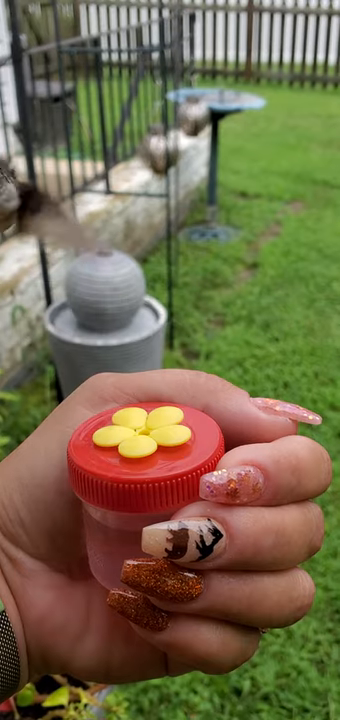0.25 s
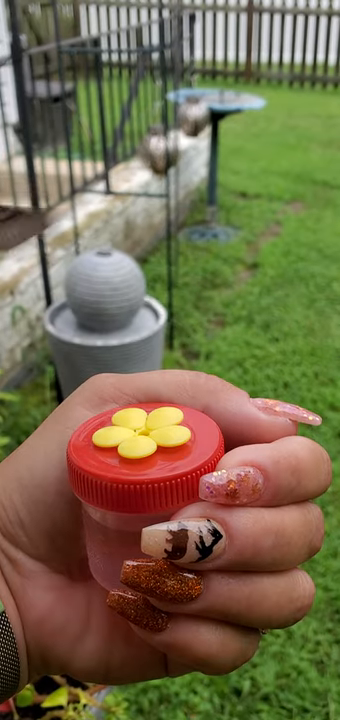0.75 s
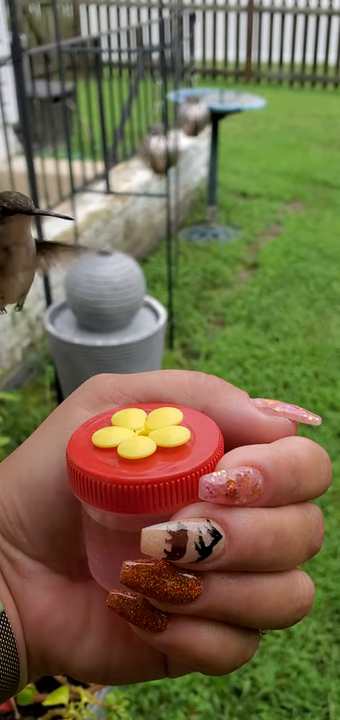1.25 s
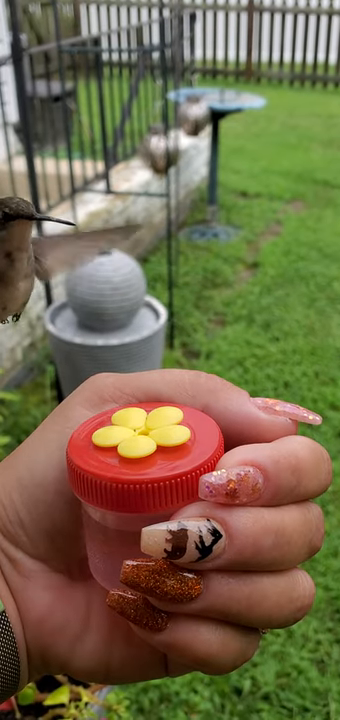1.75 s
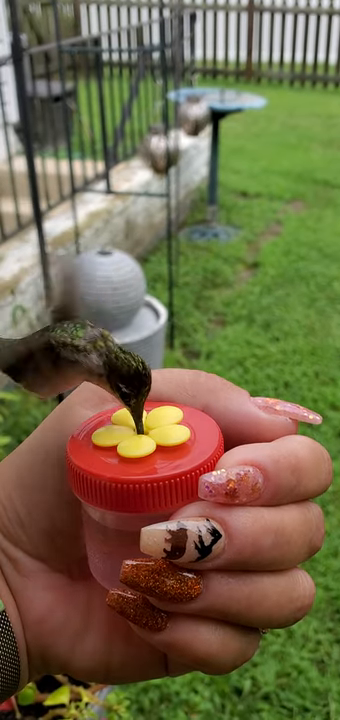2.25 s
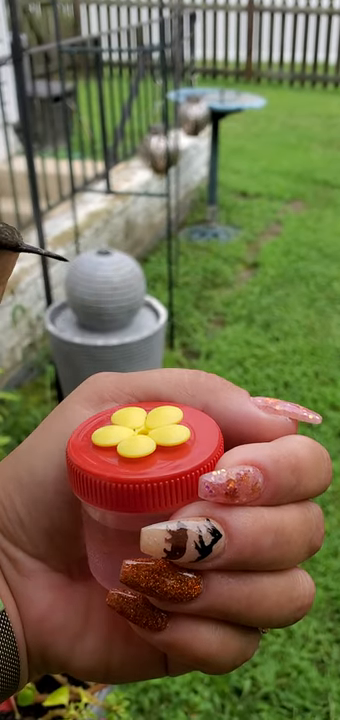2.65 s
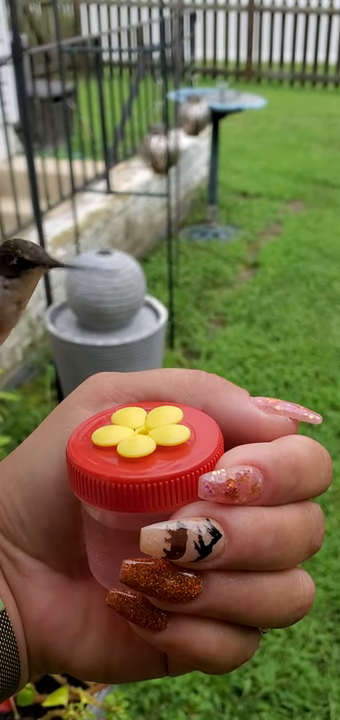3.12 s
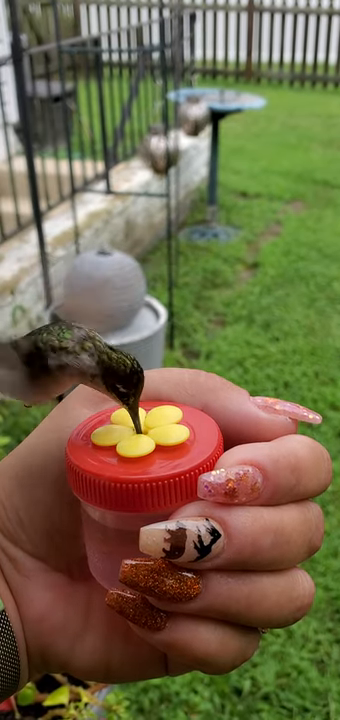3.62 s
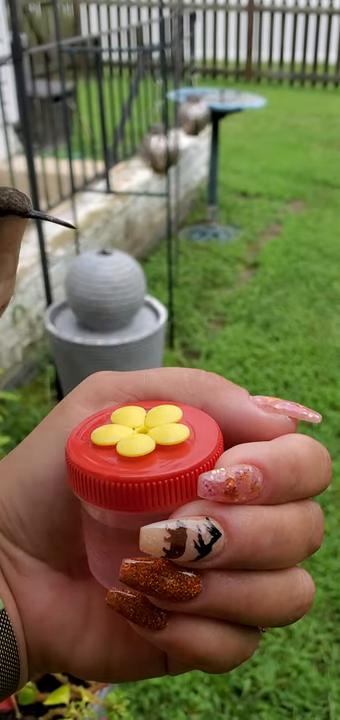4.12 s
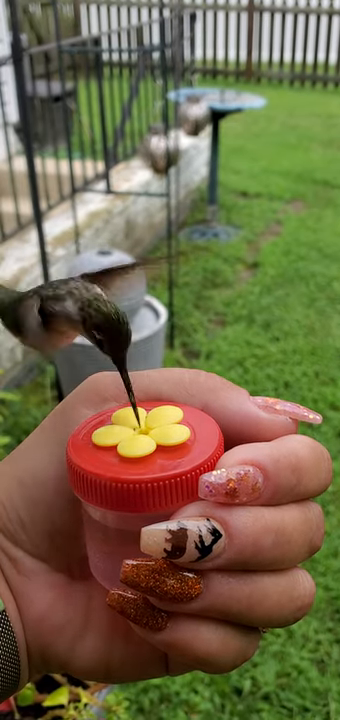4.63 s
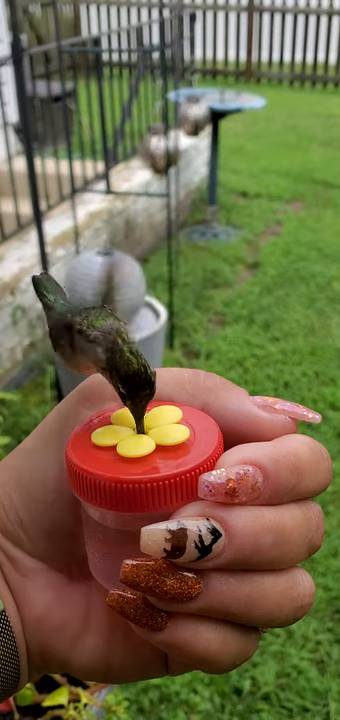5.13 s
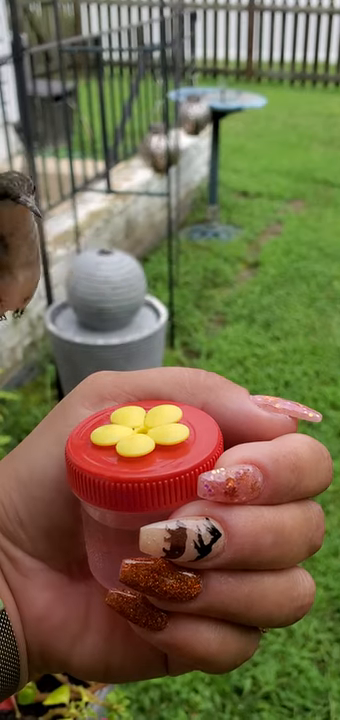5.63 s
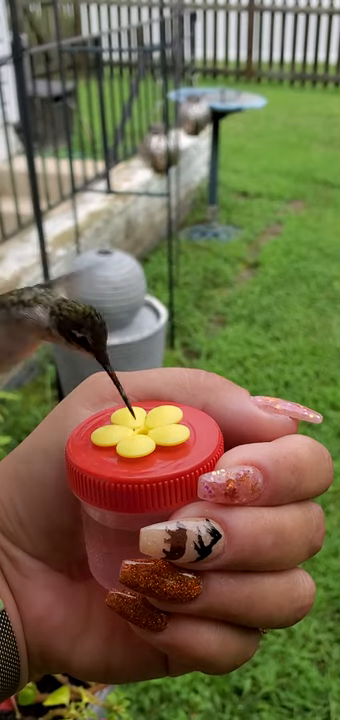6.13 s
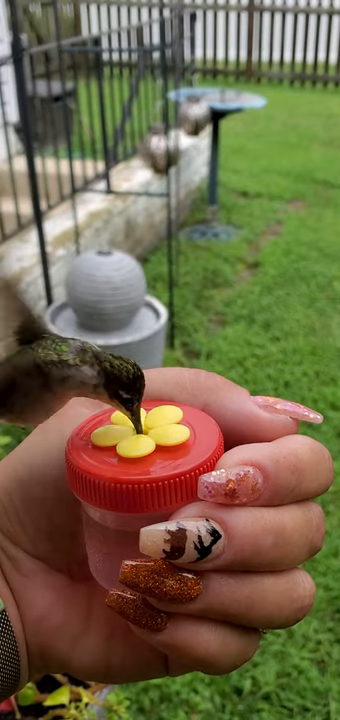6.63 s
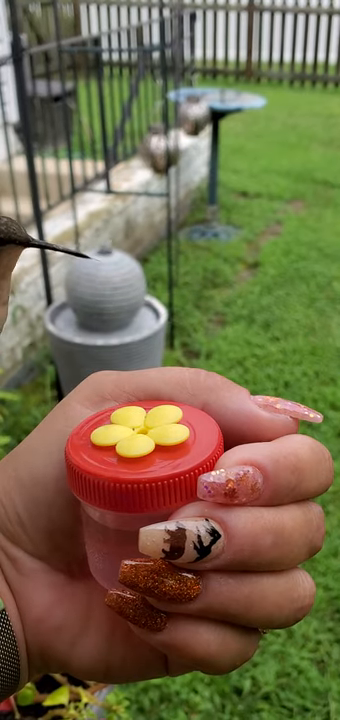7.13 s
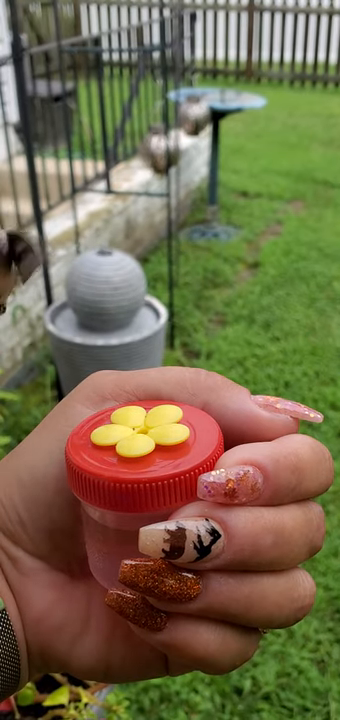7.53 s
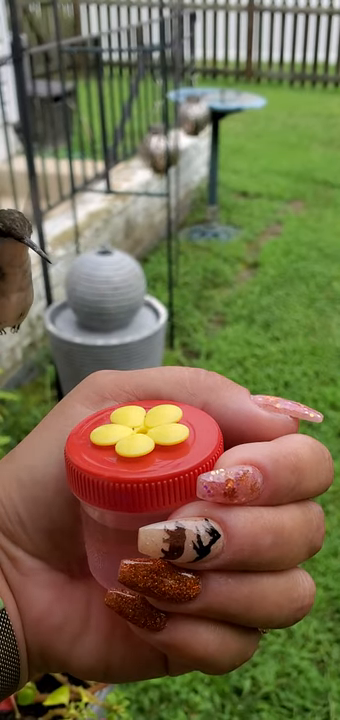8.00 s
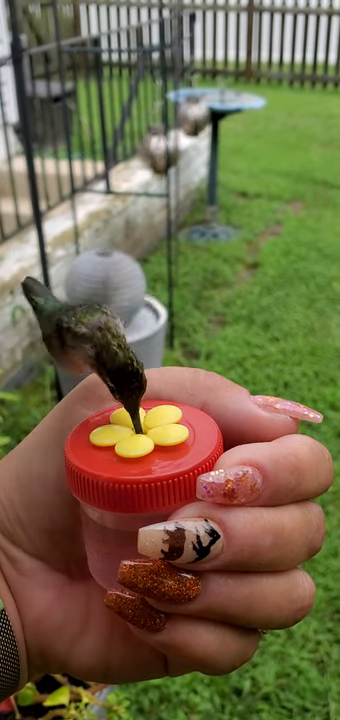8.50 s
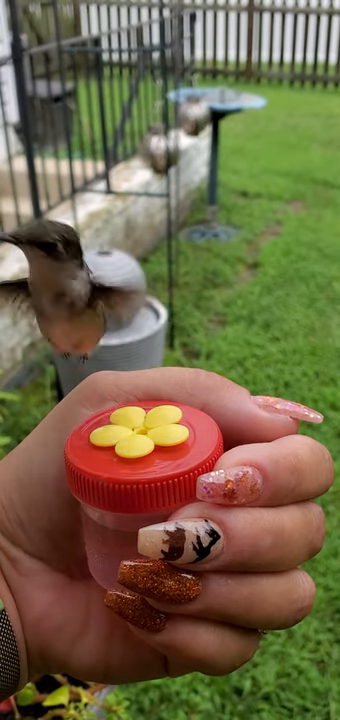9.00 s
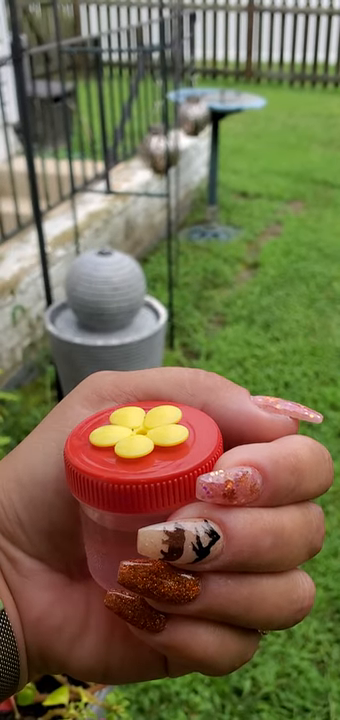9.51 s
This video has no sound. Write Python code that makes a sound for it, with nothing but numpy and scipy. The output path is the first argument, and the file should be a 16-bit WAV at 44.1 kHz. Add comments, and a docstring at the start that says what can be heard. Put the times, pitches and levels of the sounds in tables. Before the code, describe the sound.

A hummingbird's wings hum close by, surging as it darts, with two short chirps over faint backyard insects.

```python
"""A hummingbird hovers and darts at a hand-held feeder, just beside a phone with two microphone ports.
Its wings load the air periodically, so they hum in harmonics of the beat rate, stir the air and hiss at
the feather edges. It gives short falling chips, and faint ticks sound close by. Behind it a cricket
chorus swells, katydids saw, a mains transformer buzzes and a far engine drones in the yard."""
import sys
import numpy as np
from scipy import signal
from scipy.fft import rfft, irfft, next_fast_len
from scipy.io import wavfile
from scipy.ndimage import uniform_filter1d, map_coordinates

SR = 44100
rng = np.random.default_rng(int(sys.argv[2]) if len(sys.argv) > 2 else 0)


def bounce(signal):
    """Save signal as a 16-bit WAV file at the path given by the first command-line argument."""
    frames = np.transpose(np.atleast_2d(signal))
    limited = np.clip(frames, -1, 1)
    pcm = np.round(limited * 32767).astype(np.int16)
    wavfile.write(sys.argv[1], SR, pcm)


N = 430416
TIME = np.arange(N) / SR
LEFT, RIGHT = np.array([[1], [0]]), np.array([[0], [1]])


def wings():
    """Aerodynamic sound: one wingbeat cycle drives both the tonal hum and the pulsing air noise."""
    # Sudden moves that stir more air: time_s, boost_db
    darts = [(.09, 10), (1.07, 4), (1.82, 4), (1.98, 4), (2.49, 8.5), (3.81, 5.5), (4.66, 5), (5.27, 10),
             (6.08, 4.5), (6.82, 1.5), (7.37, 4), (8.32, 5), (8.98, 8.5), (9.249, 6.5), (9.42, 6.5)]
    dart_db = bumps(*np.transpose(darts), width_s=0.02497)
    beat_hz, facing, lift_db, sweep_db, lift_right_db = flight(dart_db)
    phase = 2 * np.pi * np.cumsum(beat_hz * (1 + 0.00401 * wobble(18)[0])) / SR
    hum = wing_hum(phase, dart_db, facing, lift_db, sweep_db, lift_right_db)
    return hum + downwash(phase, dart_db, lift_db) + feather_hiss(phase, dart_db)


def flight(dart_db):
    """Relaxation: each move turns the bird and pushes up the beat rate, which then decays toward rest."""
    # Held poses; facing runs from -1 (sideways) to 1 (toward the phone):
    # start_s, push_hz, facing, lift_left_db, sweep_right_db, lift_right_minus_left_db
    moves = [(0.0, 5.6, 0.43, -43, -43.5, -8), (0.221, 7.8, 0.73, -41, -48, -7),
             (0.58, 10.6, 0.7, -42, -47.5, -8), (0.981, 11.8, 0.46, -42.5, -51.5, -11),
             (1.77, 7.3, 0.29, -40, -51, -15), (1.899, 15, 0.098, -40, -46, -7),
             (2.15, 3.56, 0.19, -41, -48, -3), (2.55, 14.4, 0.4, -39.5, -45, -11),
             (2.96, 6.1, -0.61, -40, -55.5, -9), (3.17, 12.3, -0.11, -38.5, -49, -10),
             (3.699, 6.04, 0.11, -40, -49, -6.5), (3.94, 2.92, 0.45, -41, -49.5, -10),
             (4.439, 8.4, 0.12, -39.5, -47, -17.5), (4.58, 15.1, 0.44, -40, -44, -7),
             (4.89, 2.6, 0.38, -39.5, -44, -9), (5.15, 4.67, 0.48, -39, -46, -7),
             (5.41, 3.2, 0.45, -40, -49, -11), (5.98, 12.6, -0.34, -37.5, -52, -14.5),
             (6.11, 13, -0.31, -40.5, -51, -5), (6.7, 7.35, -0.09, -37.5, -50, -7),
             (6.94, 1.29, 0.21, -39.5, -49.5, -20), (7.25, 4.63, 0.53, -41, -50.5, -8),
             (7.83, 10.9, 0.31, -40.5, -51.5, -16), (8.23, 21, 0.61, -40.5, -43.5, -7),
             (8.47, 6.3, 0.22, -41.5, -43, -7), (8.61, 6.54, 0.33, -39, -43, -10),
             (8.89, 6.3, 0.39, -41.5, -45.5, -6), (9.17, 13.9, 0.17, -46.5, -49, 5.5),
             (9.4, 1.49, 0.49, -51, -64, -1.5), (9.58, 2.16, 0.71, -63, -66, -4)]
    start_s, push_hz, *pose = np.transpose(moves)
    rest_hz, opening_excess_hz, lasting_share = 39.91, 8.4, 0.225
    rise_s, overshoot_s, sag_s, settle_s = 0.055, 0.085, 1.43, 0.06
    age_s = np.maximum(TIME - start_s[:, None], 0)
    rise = 1 - np.exp(-age_s / rise_s)
    fall = lasting_share * np.exp(-age_s / sag_s) + (1 - lasting_share) * np.exp(-age_s / overshoot_s)
    beat_hz = rest_hz + opening_excess_hz * np.exp(-TIME / sag_s) + push_hz @ (rise * fall)
    beat_hz += 0.37 * dart_db  # a dart briefly quickens the beat
    held = np.array(pose)[:, np.maximum(np.searchsorted(start_s, TIME) - 1, 0)]
    facing, lift_db, sweep_db, lift_right_db = uniform_filter1d(held, round(settle_s * SR), axis=1)
    swell = lambda delay_s, width_s: bumps(np.clip(start_s + delay_s, 0, None), push_hz, width_s)
    lift_db += 0.1159 * swell(-0.063, 0.046)  # lift swells just before a push
    lift_db -= 0.5 * swell(0.029, 0.02)  # and falters as it begins
    sweep_db += 0.14 * swell(0.088, 0.027)
    return beat_hz, facing, lift_db, sweep_db, lift_right_db


def wing_hum(phase, dart_db, facing, lift_db, sweep_db, lift_right_db):
    """Dipole near field: each harmonic of the beat reaches the two ports with its own size and sign."""
    # Both half strokes push air down, so lift sounds in even harmonics: order, offset_db
    lift_overtones = [(4, -30), (6, -40.5), (8, -36.5), (10, -51.5)]

    def tone(order, db, lead_rad, spread_db):
        return np.sqrt(2) * amp(db + spread_db * wobble(14, count=2)) * np.cos(order * phase + lead_rad)

    lift_lead_rad = (3.08 + 2.42 * facing) * LEFT
    reversal_db = -54.5 + 1.16 * (sweep_db + 46.5) + 1.2 * facing  # stroke reversal follows the sweep
    flutter_db = -59.5 + 7.6 * facing + 0.31 * np.minimum(lift_db + 41.5, 0)  # tips: louder in front
    hum = (facing * LEFT + RIGHT) * tone(1, sweep_db, 0, spread_db=3)
    hum += tone(3, reversal_db + 0.55 * dart_db, -1.1 * LEFT, spread_db=1.64)
    hum += tone(5, flutter_db + 0.66 * dart_db, -0.4 * LEFT, spread_db=1.64)
    hum += tone(7, flutter_db - 7, 0, spread_db=3)
    hum += tone(2, lift_db + RIGHT * lift_right_db, lift_lead_rad, spread_db=1.97)
    # A dart sharpens the stroke; facing away hides the overtones from the right port.
    overtone_db = 0.62 * lift_db + 0.96 * dart_db - 4 * facing + (14 * facing - 9) * RIGHT
    for order, offset_db in lift_overtones:
        hum += tone(round(order), overtone_db + offset_db, lift_lead_rad, spread_db=3.5)
    return hum


def downwash(phase, dart_db, lift_db):
    """Turbulence: stirred air makes a low rush that pulses on each half stroke."""
    # Spectral shape of the rush: frequency_hz, left_db, right_db
    spectrum = [(20.2, -29, -46), (39.8, -10, -7), (74, 4, 6), (135, -2, -1.5), (242, -5, -5),
                (414, -11, -10.5), (574, -24, -25.5), (1560, -57, -50)]
    leaving_db = 0.14 * np.minimum(lift_db + 46.5, 0)
    gain = amp(-49.5 + dart_db + leaving_db + 1.26 * wobble(7))
    return gain * unit((1 + 0.22 * np.cos(2 * phase)) * noise(coloured(spectrum), coherence=0.62))


def feather_hiss(phase, dart_db):
    """Edge noise: the feathers hiss on every half stroke, more on the down stroke."""
    # Base level of the hiss: time_s, level_db
    envelope = [(0, -59), (1.8, -64), (2.3, -57), (5.4, -61.5), (6.5, -57.5), (8, -60.5), (9.3, -56),
                (9.6, -69)]
    puffs = 1 + 0.76 * np.cos(2 * phase) + 0.27 * np.cos(phase)
    hiss = unit(noise(coloured([(2500, -34, -34), (9150, -22, -20), (15400, 5, -9)])))
    return amp(curves(envelope) + 0.41 * dart_db + 0.6 * wobble(7.4)) * puffs * hiss


def chips():
    """Source and filter: the throat shapes a falling harmonic call, which wall and fence reflect."""
    # Calls: start_s, source_db, left_minus_right_db, pitch_hz
    calls = [(1.848, -32, 7.5, 2138), (2.961, -31.5, 6, 2200), (9.057, -62.5, 9, 2780),
             (9.614, -55, 5, 2198)]
    # Contour of one call: time_s, pitch_ratio, gain_db
    glide = [(0, 1.02, -14), (.004, 0.97, 1), (.010, .96, 2.5), (.014, .88, 1.5), (.019, .79, -1),
             (.022, .72, -7.5), (.025, 0.65, -24)]
    # Throat response: frequency_hz, gain_db
    throat = [(1400, -11), (2200, -3.5), (4000, -3.5), (5000, -11), (6200, 1.5), (8200, -7), (10500, -13),
              (12500, -24), (15000, -13)]
    out, t = np.zeros((2, N + SR)), np.arange(round(glide[-1][0] * SR)) / SR
    pitch_ratio, contour_db = curves(glide, t)
    orders = np.arange(1, 10)[:, None]
    right_delay_s, reverb_s = 0.0012, 0.12
    for start_s, source_db, pan_db, pitch_hz in calls:
        hz = orders * pitch_hz * pitch_ratio
        harmonics = coloured(throat)(hz)[0] * np.sin(2 * np.pi * np.cumsum(hz, axis=1) / SR)
        hoarseness = 1 + 1.6 * uniform_filter1d(rng.standard_normal(len(t)), size=40)
        call = amp(source_db + contour_db) * harmonics.sum(axis=0) * hoarseness
        out[0, round(start_s * SR):][:len(t)] += call
        out[1, round((start_s + right_delay_s) * SR):][:len(t)] += call * amp(-pan_db)
    echo = rng.standard_normal((2, SR // 8)) * amp(-60 * np.arange(SR // 8) / SR / reverb_s)
    echo /= np.linalg.norm(echo[0])
    return out[:, :N] + amp(-15.5) * signal.fftconvolve(out, echo, axes=1)[:, :N]


def ticks():
    """Exponential decay: each faint dry tick is a noise burst, with a ringing tone in the lower ones."""
    # Ticks close by: start_s, level_db, centre_hz
    events = [(.43, -69, 4300), (4.42, -66, 4297), (5.615, -59.5, 8514), (5.68, -63, 9970),
              (5.692, -61, 12530), (6.805, -60, 2185), (7.038, -60, 1480), (8.187, -62.5, 4800),
              (8.501, -53, 8910), (8.52, -60.5, 10990), (8.567, -57, 11000), (8.575, -58.5, 2860),
              (9.196, -56, 1904), (9.545, -57, 11000)]
    out, t = np.zeros((2, N + SR)), np.arange(SR // 50) / SR
    attack_s, t60_s = 0.0017, 0.058
    envelope = amp(5.5 - 60 * t / t60_s) * (1 - np.exp(-t / attack_s))
    for start_s, level_db, hz in events:
        sos = signal.butter(2, [0.72 * hz, 1.4 * hz], "bandpass", fs=SR, output="sos")
        burst = unit(signal.sosfilt(sos, rng.standard_normal(len(t))))
        ring = np.sin(2 * np.pi * hz * t) * (hz < 5000)
        out[:, round(start_s * SR):][:, :len(t)] += amp(level_db - 5 * RIGHT) * envelope * (burst + ring)
    return out[:, :N]


def crickets():
    """Incoherent summation: many crickets blur into noise bands, the near one swelling and trilling."""
    # Runs of chorus swells: start_s, count, interval_s
    swell_runs = [(.31, 3, .375), (1.54, 8, .365), (4.38, 5, .345), (6.17, 3, .375), (7.33, 5, .41),
                  (9.49, 1, 0)]
    swells = amp(-57.5) * uneven_bumps(runs(swell_runs), spread_db=0.5, width_s=0.049)
    trill = 1 + 0.14 * np.cos(2 * np.pi * np.cumsum(100 + 4 * wobble(5.7)[0]) / SR)
    near = (amp(-63) + 0.5 * swells) * trill * unit(noise(band(6057, 365), coherence=0.055))
    far = amp(-62.5 + 0.67 * wobble(6)) * unit(noise(band(6680, 770), coherence=0.058))
    return near * amp([[2], [-3]]) + far * amp([[1], [-1.5]])


def katydids():
    """Stridulation: three katydids saw, each at its own pitch and pace, two with fast tooth pulses."""
    # Runs of strokes of the middle-pitched insect: start_s, count, interval_s
    stroke_runs = [(.24, 4, .235), (1.26, 8, .29), (3.52, 29, .2203)]
    teeth = (1 + np.cos(2 * np.pi * np.cumsum(112 + 5 * wobble(5.9)[0]) / SR)) ** 0.12
    strokes = 0.14 + uneven_bumps(runs(stroke_runs), spread_db=1.9, width_s=0.034)
    middle = strokes * amp(-64.5) * unit(teeth * noise(band(9010, 400)))
    high = amp([[-69], [-64]]) * unit(teeth * noise(band(9320, 250)))
    low = amp([[-68], [-78]]) * unit(noise(band(8270, 300)))
    high *= 0.096 + uneven_bumps(np.arange(0.105, N / SR, 0.2208), spread_db=1.9, width_s=0.02)
    low *= 0.11 + uneven_bumps(np.arange(0.013, N / SR, 0.112), spread_db=2.2, width_s=0.015)
    return middle + high + low


def transformer():
    """Interference: each overtone of the buzz fades in and out as it meets its slowly shifting echo."""
    # Harmonics of twice the mains frequency: order, left_db, right_db, left_lead_rad, null_s, period_s
    overtones = [(9, -73, -79, 1.4, 5, 60), (10, -67, -78, .1, 4, 60), (11, -64, -71, -.1, 5.25, 60),
                 (12, -68, -69, 1.6, -2, 60), (17, -84, -87, 1.6, 6, 12), (20, -74, -73, -1.6, 2.75, 9),
                 (21, -75, -75, -.1, .5, 10), (22, -77, -78, .6, 4, 4.5), (23, -76, -72, -1.1, 8.25, 20),
                 (24, -75, -82, 1.5, 2, 9), (25, -81, -85, -1.1, -1.25, 7.5), (26, -66, -73, -.6, 7, 60),
                 (27, -72, -76, 2.5, 4, 60), (28, -86, -86, 1.1, 1, 4.5)]
    fundamental_hz, buzz = 120.02, 0
    for order, left_db, right_db, lead_rad, null_s, period_s in overtones:
        fading = np.abs(1 - 0.6 * np.exp(2j * np.pi * (TIME - null_s) / period_s))
        phase = 2 * np.pi * fundamental_hz * order * TIME + rng.uniform(0, 2 * np.pi) + lead_rad * LEFT
        level_db = left_db * LEFT + right_db * RIGHT + 1.2 * wobble(2, count=2)
        buzz += np.sqrt(2) * amp(level_db) * fading * np.sin(phase)
    return buzz


def far_engine():
    """Slow modulation: a far engine is one low tone that wavers in pitch and level."""
    # Course of the drone: time_s, pitch_hz, level_db
    drone = [(0, 85.55, -67), (2.6, 85.55, -49.5), (3.3, 81.88, -53), (4.7, 82.37, -50.5), (6, 83.15, -59),
             (7.5, 82.18, -74), (9.76, 83.1, -54)]
    pitch_hz, level_db = curves(drone)
    return np.sqrt(2) * amp(level_db + 1.4 * wobble(3.1)) * np.sin(2 * np.pi * np.cumsum(pitch_hz) / SR)


def yard():
    """Noise floor: distant traffic, leaves and microphone hiss, nearly uncorrelated between the ports."""
    # Spectral density: frequency_hz, left_db_per_hz, right_db_per_hz
    spectrum = [(403, -100, -100), (583, -90.5, -96.5), (790, -91, -89), (1054, -97.5, -100),
                (1365, -93, -96.5), (1800, -100, -104), (2580, -98.5, -101), (3780, -105, -108),
                (5500, -104, -111), (7400, -101, -108), (10300, -107, -107), (11800, -105, -105),
                (15400, -99, -110)]
    drift = amp(0.7 * wobble(5, count=2))
    return np.sqrt(SR / 2) * drift * noise(coloured(spectrum), coherence=0.012)


def amp(db):
    """Decibels to amplitude ratio."""
    return 10 ** (np.asarray(db) / 20)


def unit(x):
    """Normalisation to rms 1."""
    return x / np.sqrt(np.mean(x ** 2))


def curves(rows, at=TIME):
    """Linear interpolation of each later column against the first."""
    knots, *columns = np.transpose(rows)
    return np.array([np.interp(at, knots, column) for column in columns])


def wobble(rate_hz, count=1):
    """Smooth random curves: splines through rate_hz knots a second."""
    knots = rng.standard_normal((count, int(N * rate_hz / SR) + 4))
    return np.array([map_coordinates(row, [TIME * rate_hz]) for row in knots])


def filtered(x, response):
    """Linear filtering: the spectrum of x times a frequency response."""
    size = next_fast_len(N + 8192)
    return irfft(rfft(x, size) * response(np.fft.rfftfreq(size, 1 / SR) + 1), size)[..., :N]


def noise(response, coherence=0):
    """Partial coherence: coloured noise at both ports, a share of it common."""
    common, separate = rng.standard_normal((2, N))
    right = coherence * common + np.sqrt(1 - coherence ** 2) * separate
    return filtered(np.array([common, right]), response)


def coloured(points):
    """Frequency response through (hz, db, ...) points on a logarithmic axis."""
    return lambda hz: amp(curves([(np.log(f), *db) for f, *db in points], np.log(hz)))


def band(centre_hz, width_hz):
    """Frequency response of a steep resonance."""
    return lambda hz: 1 / (1 + ((hz - centre_hz) / (width_hz / 2)) ** 2)


def bumps(times_s, heights, width_s):
    """Bell-shaped swells: impulses smoothed by a Gaussian."""
    pulses = np.bincount(np.round(np.asarray(times_s) * SR).astype(int), heights, N)[:N]
    area = SR * width_s * np.sqrt(2 * np.pi)
    return np.abs(filtered(pulses, lambda hz: area * np.exp(-2 * (np.pi * hz * width_s) ** 2)))


def uneven_bumps(times_s, spread_db, width_s):
    """Swells whose heights scatter about 1."""
    return bumps(times_s, amp(spread_db * rng.standard_normal(len(times_s))), width_s)


def runs(rows):
    """Times of evenly spaced repeats."""
    return np.concatenate([start_s + gap_s * np.arange(count) for start_s, count, gap_s in rows])


def scene():
    """Superposition: the pressures of all sources add at the two ports."""
    return wings() + chips() + ticks() + crickets() + katydids() + transformer() + far_engine() + yard()


def record(dry):
    """Band limiting: the phone keeps nothing above its cutoff."""
    cutoff_hz = 15780
    return filtered(dry, lambda hz: hz < cutoff_hz)


dry = scene()
out = record(dry)
bounce(out)
```